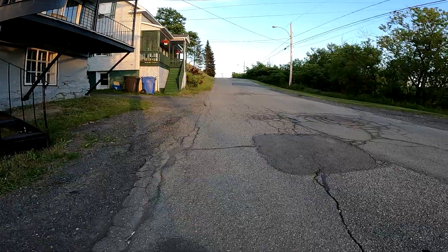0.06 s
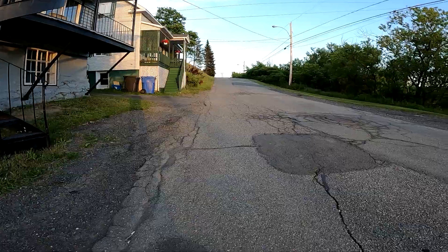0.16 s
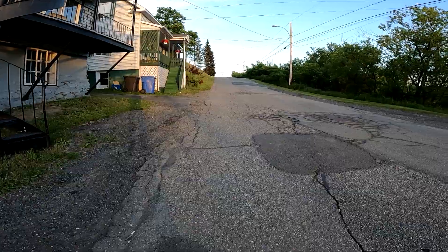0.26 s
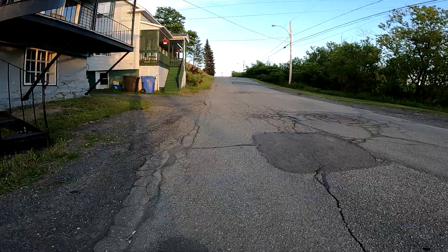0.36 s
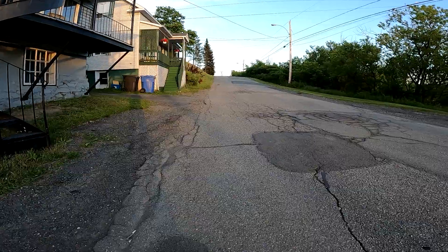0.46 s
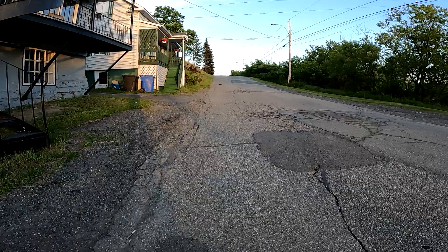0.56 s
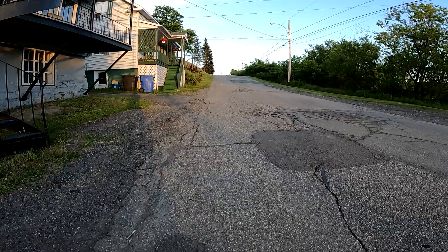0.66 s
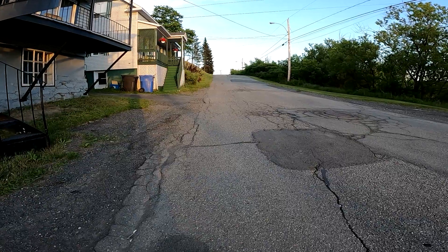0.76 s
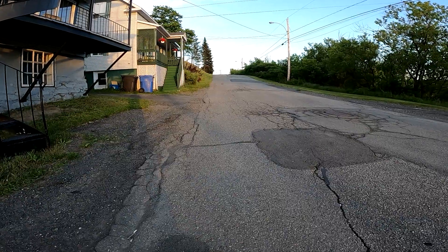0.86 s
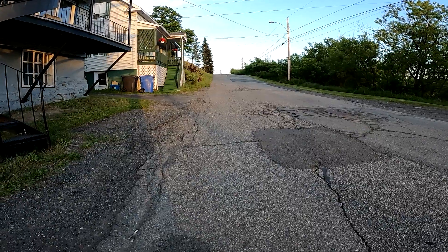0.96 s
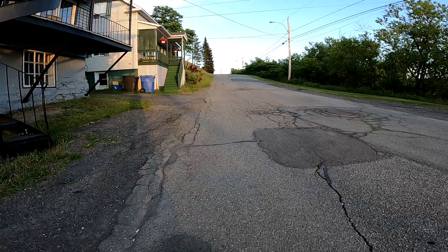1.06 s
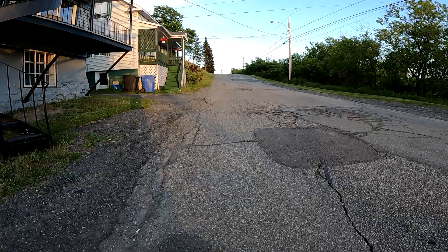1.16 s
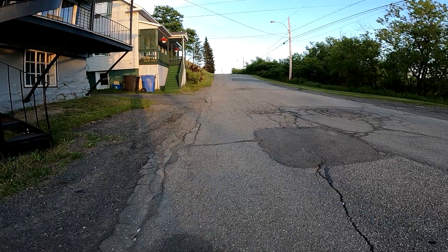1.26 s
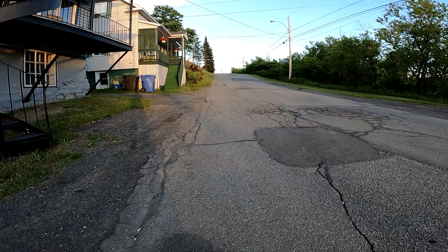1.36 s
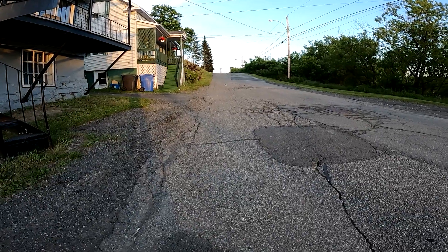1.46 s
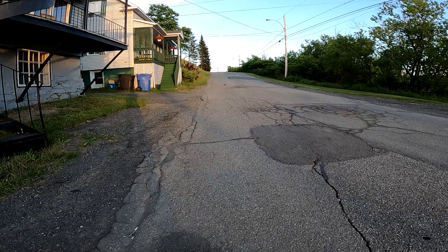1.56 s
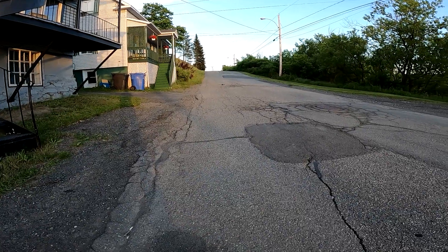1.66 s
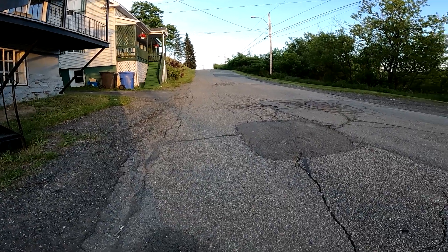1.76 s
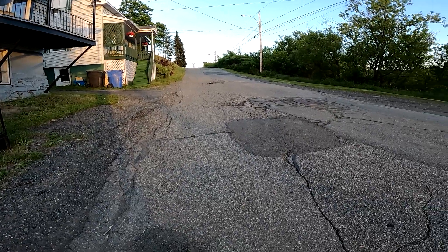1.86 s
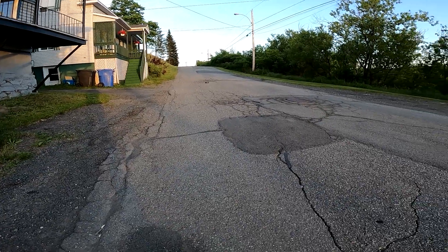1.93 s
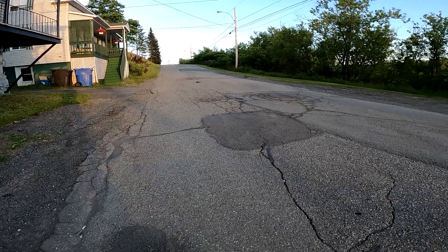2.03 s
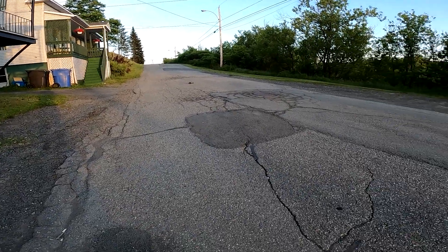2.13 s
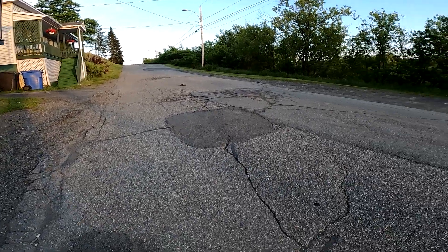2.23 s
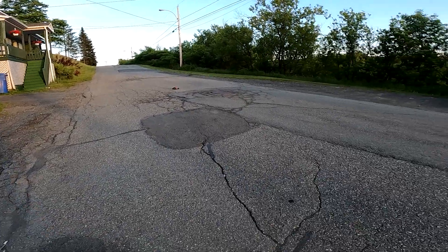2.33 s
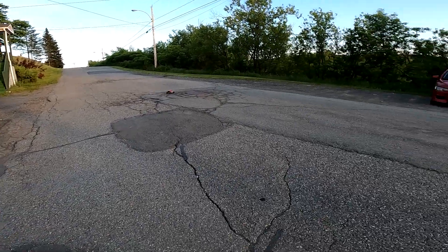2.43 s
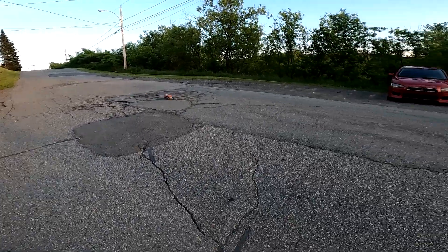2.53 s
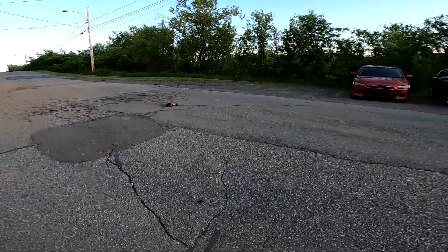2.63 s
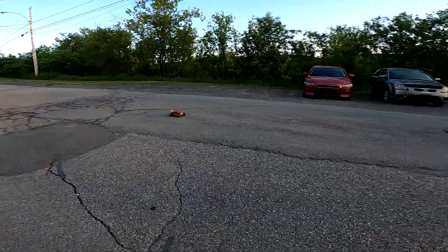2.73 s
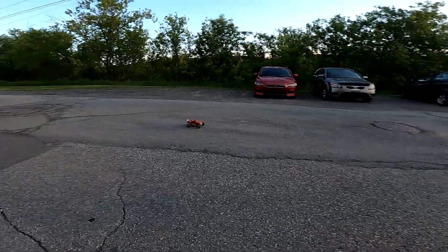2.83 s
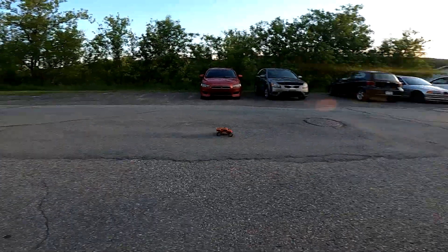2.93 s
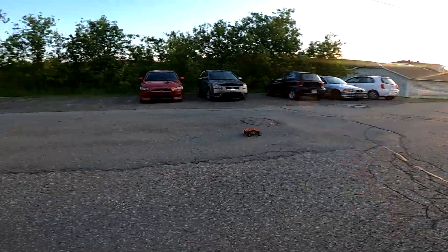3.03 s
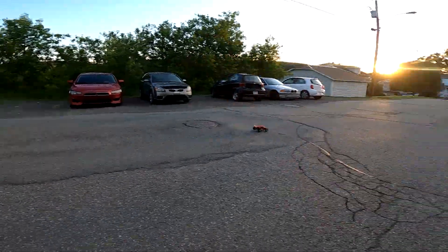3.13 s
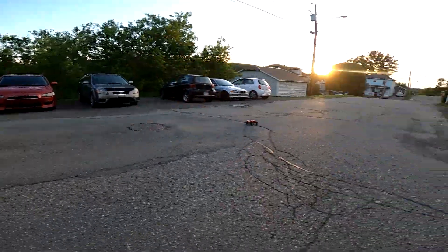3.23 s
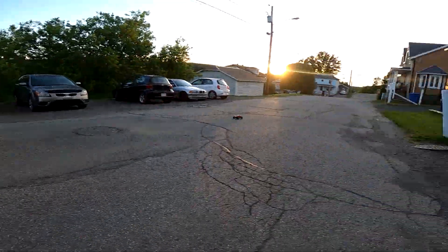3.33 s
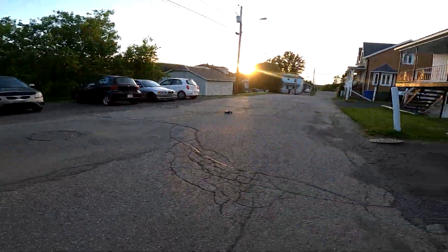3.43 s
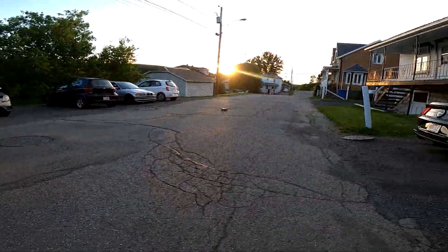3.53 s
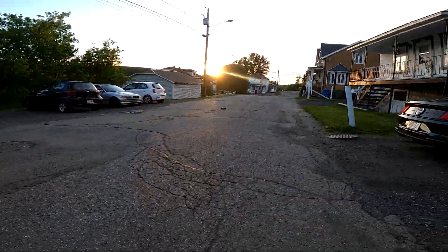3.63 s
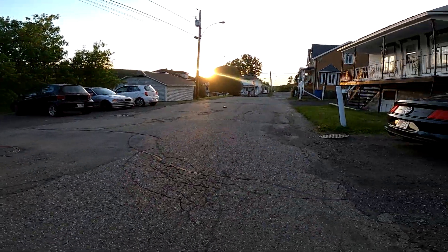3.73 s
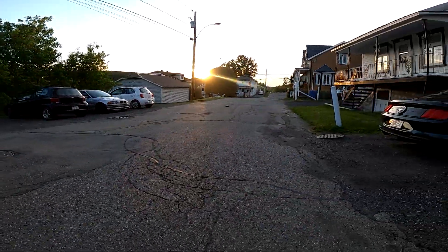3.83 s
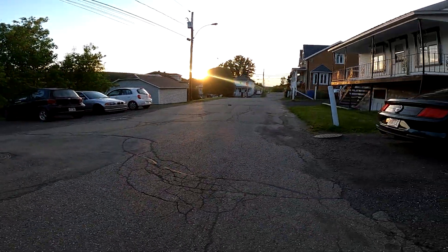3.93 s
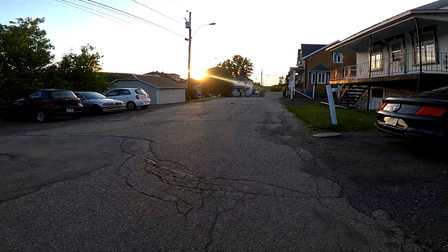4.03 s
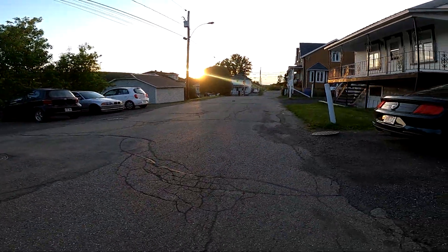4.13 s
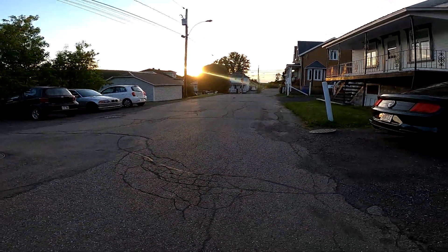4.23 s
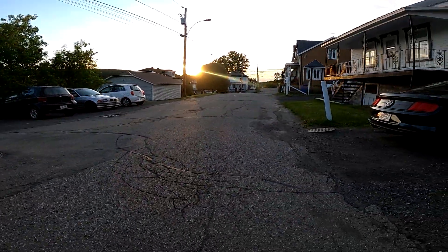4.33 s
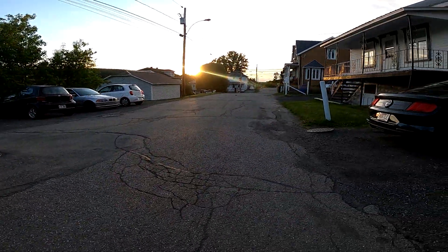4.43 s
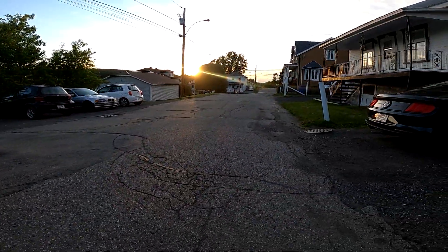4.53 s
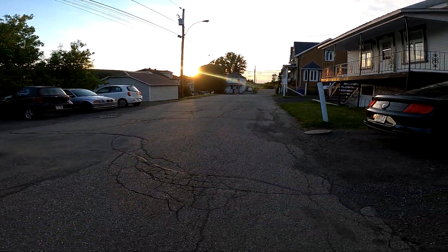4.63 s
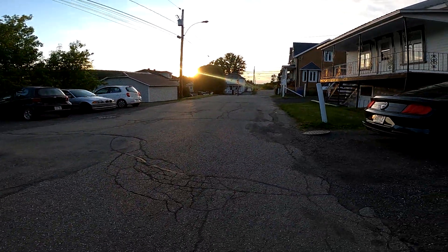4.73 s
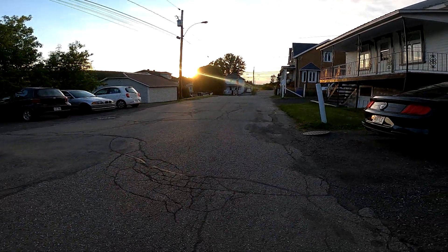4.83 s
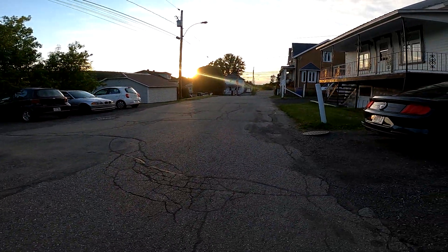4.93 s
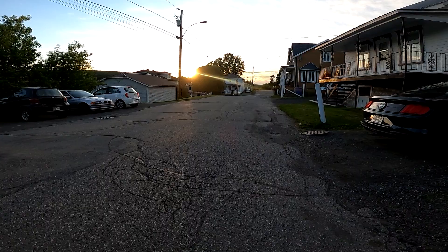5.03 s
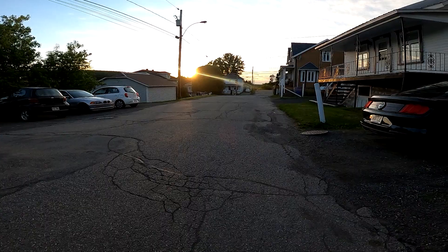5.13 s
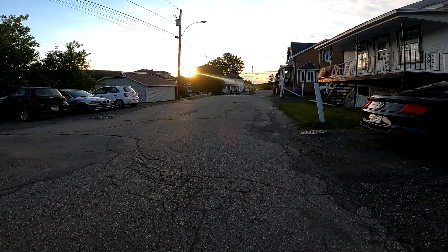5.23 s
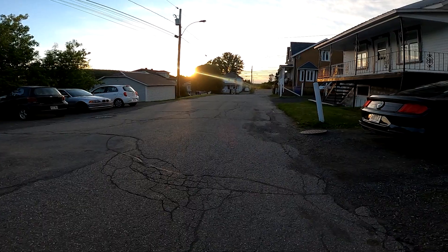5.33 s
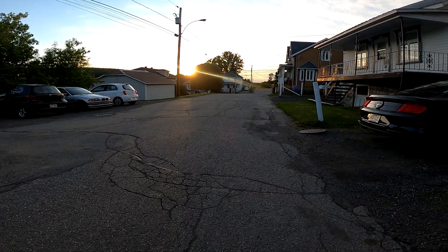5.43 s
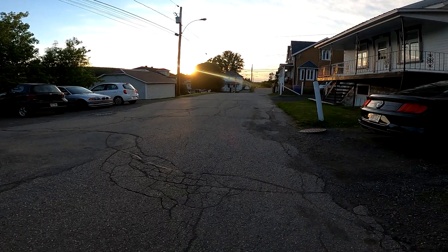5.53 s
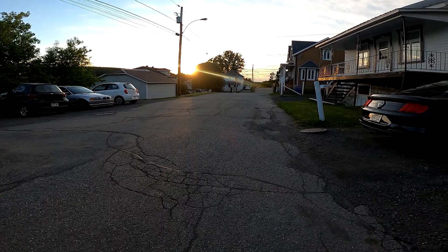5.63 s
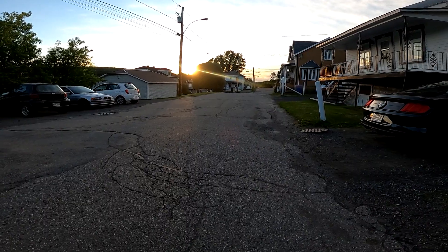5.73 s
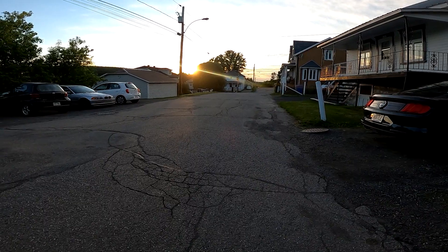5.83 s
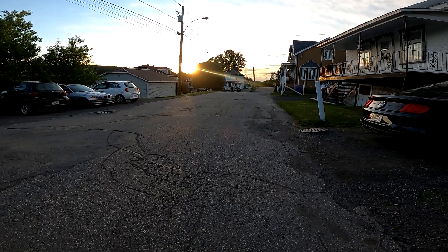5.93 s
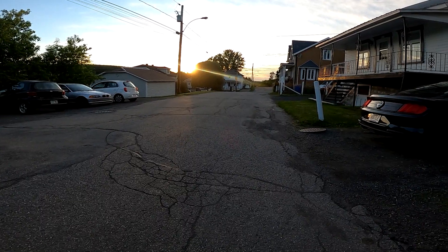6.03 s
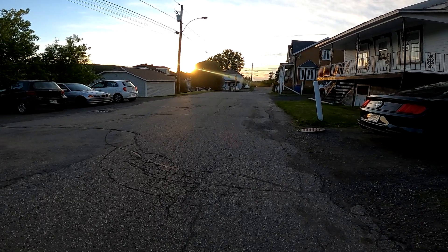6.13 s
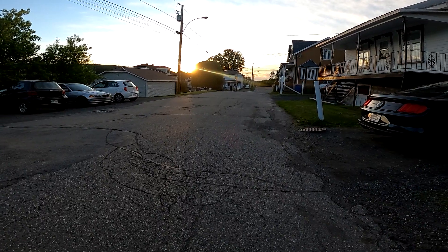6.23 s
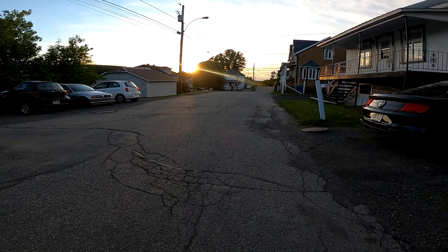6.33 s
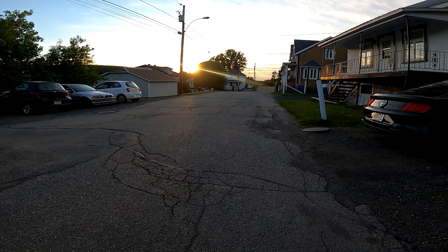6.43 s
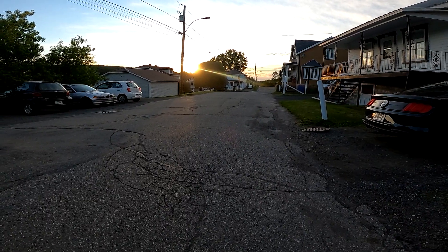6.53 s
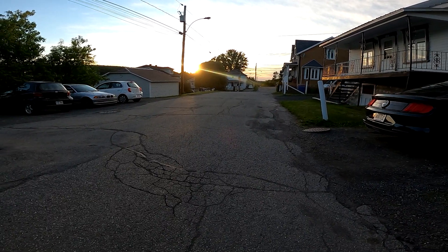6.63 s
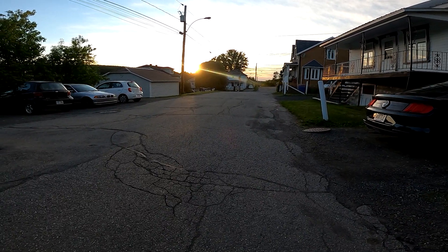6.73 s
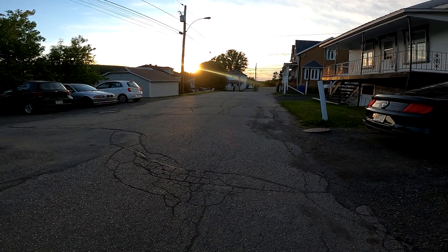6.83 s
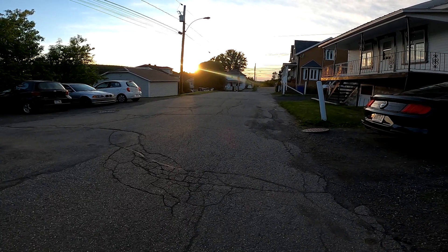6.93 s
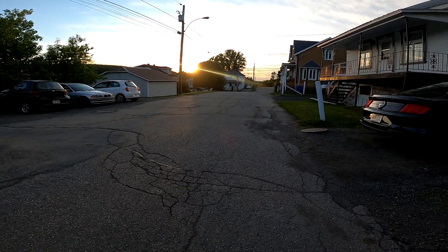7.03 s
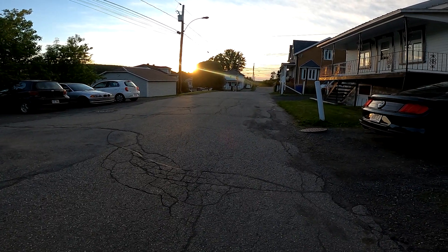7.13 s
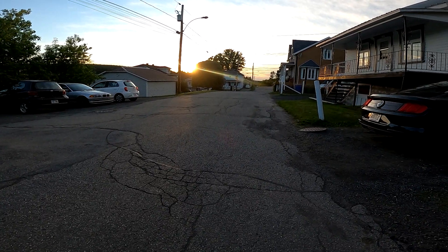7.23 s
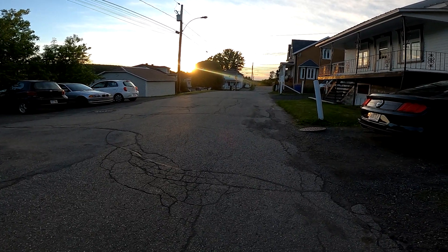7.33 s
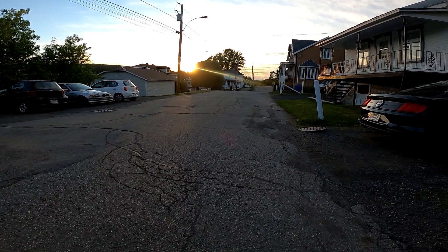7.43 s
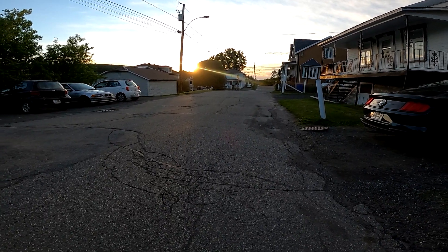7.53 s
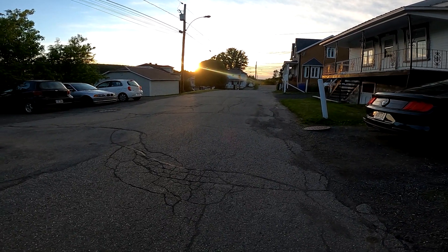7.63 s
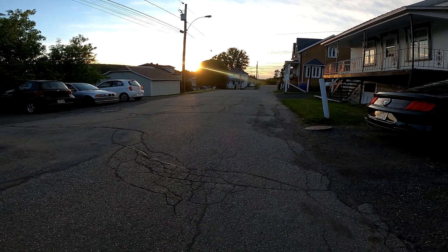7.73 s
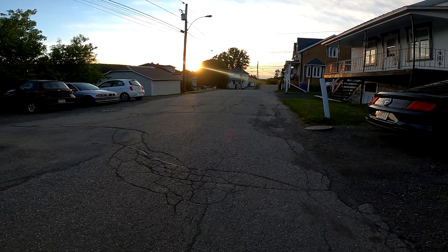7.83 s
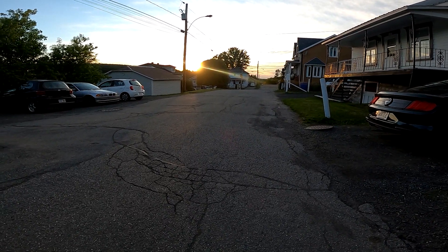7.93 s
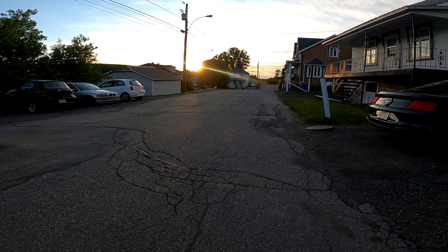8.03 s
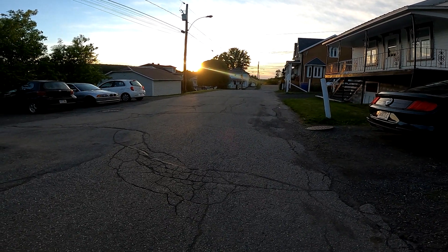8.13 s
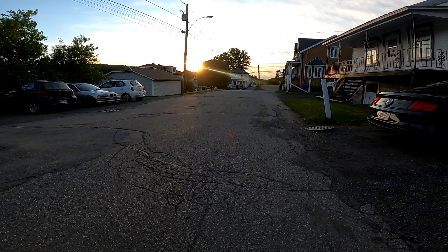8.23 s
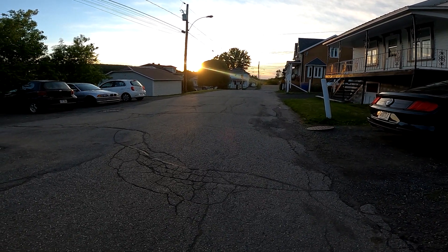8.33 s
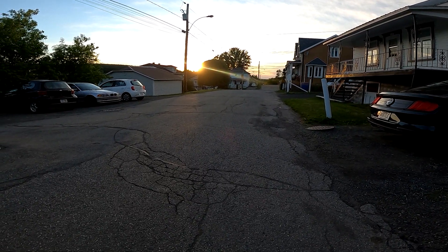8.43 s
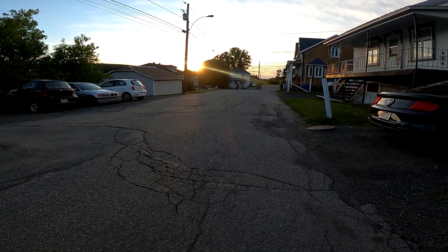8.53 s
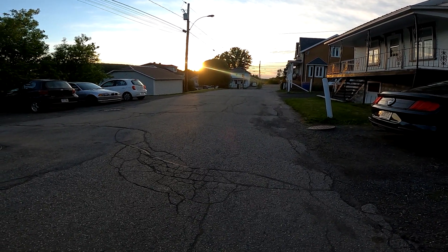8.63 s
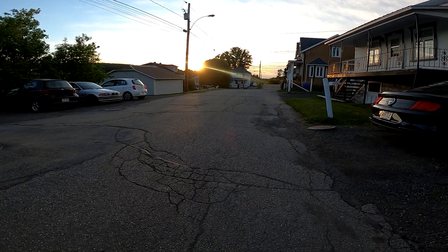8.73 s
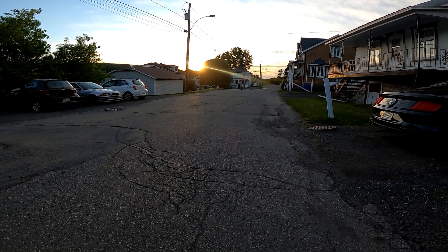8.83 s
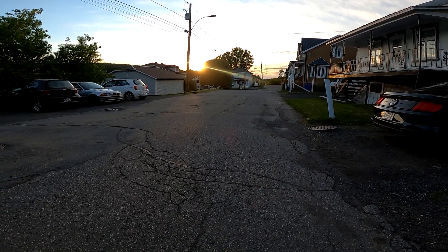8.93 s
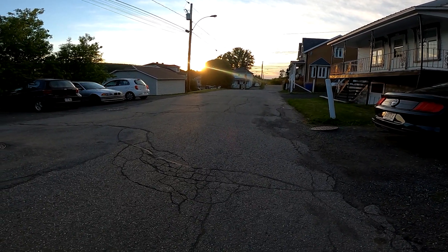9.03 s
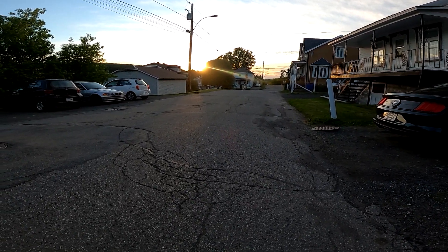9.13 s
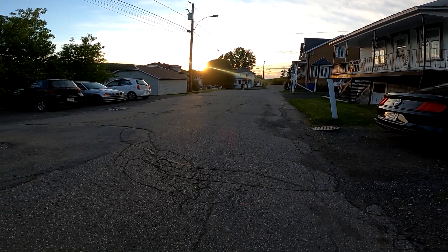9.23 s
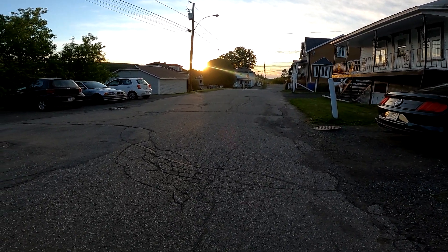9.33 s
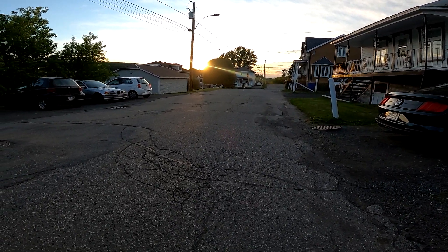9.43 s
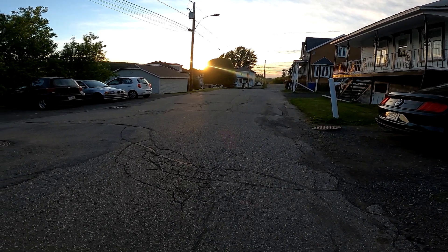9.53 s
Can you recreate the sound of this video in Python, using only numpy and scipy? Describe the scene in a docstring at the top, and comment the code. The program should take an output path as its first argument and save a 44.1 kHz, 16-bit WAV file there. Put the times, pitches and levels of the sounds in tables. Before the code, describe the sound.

A small electric model truck whistles away, swells into a hissing, whining rush past on cracked asphalt, fades down the street, then starts nearer again.

```python
"""From the kerb of a quiet asphalt street: a small electric model truck whistles as it pulls away, then
races past; its gears hiss through a ringing shell, its tyres scuff and its chassis knocks on cracks.
It fades far down the street; a bird chips, the motor whistles up twice more and the truck comes nearer.
All along, a distant engine eases off beside a hum and faint low tones, over far traffic and leaves,
and gusts of wind rumble and buffet the two microphone ports."""
import sys
import numpy as np
from scipy import signal
from scipy.fft import rfft, irfft, next_fast_len
from scipy.io import wavfile
from scipy.ndimage import uniform_filter1d

SR = 44100
rng = np.random.default_rng(int(sys.argv[2]) if len(sys.argv) > 2 else 0)


def output_pcm(signal):
    """Save a mono or channel-first signal as 16-bit PCM at the path in sys.argv[1].

    Samples are clipped to [-1, 1] before scaling.
    """
    pcm = np.clip(np.atleast_2d(signal).T, -1, 1) * 32767
    wavfile.write(sys.argv[1], SR, np.round(pcm).astype(np.int16))


N = 422919

# whine of the meshing gears, wavering as the wheels skip: t/s, f/Hz, level against the truck's/dB
MESH_WHINE = [(.1, 2980, -33), (1.3, 3140, -23), (2.05, 3044, -14), (2.16, 3087, -16.5), (2.27, 3336, -15),
              (2.32, 3130, -20), (2.39, 3370, -9), (2.44, 3203, -10.5), (2.5, 3370, -10), (2.56, 3245, -11),
              (2.6, 3237, -4), (2.66, 3330, -14), (2.72, 3170, -9), (2.79, 3350, -5.5), (2.86, 3130, -14),
              (2.93, 3060, -43), (3.05, 3134, -11.5), (3.2, 3000, -18), (3.45, 2848, -22), (3.51, 2880, -8),
              (3.6, 2825, -15), (3.68, 3096, -10.5), (3.76, 3220, -26), (3.85, 3055, -28),
              (3.95, 3280, -13), (4.03, 3270, -24), (4.1, 3320, -19), (4.3, 3310, -11.5), (4.5, 3200, -27),
              (6.6, 3160, -18), (6.8, 3230, -24.5), (7, 3250, -17), (7.9, 3200, -26), (8.1, 3170, -21.5),
              (8.8, 3230, -20), (9.59, 3276, -23)]


def amp(db):
    """Decibels to gain."""
    return 10 ** (np.asarray(db) / 20)


def evened(x):
    """Scales to rms 1."""
    return x / np.sqrt(np.mean(x ** 2) + 1e-20)


def read(points, hz):
    """A spectrum table on a log-frequency axis."""
    f, value = np.transpose(points)
    return np.interp(np.log(hz + 1), np.log(f + 1), value)


def curves(rows, t):
    """Every column of a time table at times t."""
    s, *columns = np.transpose(rows)
    return [np.interp(t, s, c) for c in columns]


def wander(count, smooth):
    """Slow chance of rms 1, smoothed twice over so many steps."""
    once = uniform_filter1d(rng.standard_normal(count), smooth)
    return evened(uniform_filter1d(once, smooth))


def grid(size, hop):
    """Frequencies (column) and frame times."""
    return np.fft.rfftfreq(size, 1 / SR)[:, None], np.arange(N // hop + 5) * hop / SR


def truck():
    """Gear hiss and tyre roar throbbing once a turn of the shaft, with a mesh whine swaying in phase."""
    shaft_per_s, shaft_depth = 89, 0.12
    t = np.arange(N) / SR
    shaft_turns = np.cumsum(shaft_per_s * (1 + 0.0346 * wander(count=N, smooth=3200))) / SR
    throb = 1 + shaft_depth * np.cos(2 * np.pi * shaft_turns)
    # rough asphalt shakes the shell
    rattle = amp(0.94 * wander(count=N, smooth=100) + 0.4 * wander(count=N, smooth=320))
    frame_s = grid(size=512, hop=128)[1]
    power = amp(2 * np.interp(t, frame_s, truck_db(frame_s))) + scuff_power()
    return (gear_hiss() * throb + mesh(t, shaft_turns)) * rattle * np.sqrt(power)


def truck_db(t):
    """Loudness of the run at the microphone, with its dips and a far burst of throttle."""
    # loudness of the run: t/s, level/dB
    run = [(0, -91), (.11, -61), (.3, -55), (.52, -48.5), (1.14, -40), (1.3, -40), (1.42, -35.5),
           (1.8, -33), (2.17, -26.5), (2.62, -21), (2.89, -25), (3.05, -19.5), (3.13, -19.5), (3.17, -25),
           (3.3, -28), (3.49, -22.5), (4.19, -26.5), (4.51, -35), (4.59, -33), (4.88, -37), (5.04, -37.5),
           (5.14, -41), (5.42, -49.5), (5.82, -53.5), (6.5, -64.5), (7.05, -63.5), (7.3, -68.5),
           (7.75, -74), (7.79, -68), (7.92, -52), (8.33, -51.5), (9.59, -34.5)]
    # the level dips briefly: t/s, depth/dB
    dips = [(1.24, 3), (2.64, 2.5), (2.73, 6.5), (4.18, 1.5), (5.11, 6), (5.181, 8), (5.28, 10.5),
            (5.38, 9), (8.74, 0.5)]
    # short burst of throttle far off: start/s, end/s, level/dB
    bursts = [(6.612, 6.957, -47.5)]
    dip_s, swell_db_per_s, rise_s, fall_db_per_s = 0.028, 7, 0.039, 147  # rise: s for 20 dB
    db = curves(run, t)[0]
    for s, depth in dips:
        db = db - depth * np.exp(-((t - s) / dip_s) ** 2)
    for start, end, top_db in bursts:
        burst_db = top_db - swell_db_per_s * np.maximum(end - t, 0)
        burst_db -= 20 * np.maximum(start - t, 0) / rise_s
        burst_db -= fall_db_per_s * np.maximum(t - end, 0)
        db = np.maximum(db, burst_db)
    return db


def scuff_power():
    """Power added as tyres land and scrub: a fast rise, then a straight fade in decibels."""
    # scuffs: t/s, level/dB (each is played 6 dB lower)
    scuffs = [(2.7521, -24), (3.3156, -16.5), (3.472, -14), (5.0097, -28), (5.1094, -46), (5.2092, -50),
              (5.305, -37), (5.3892, -42), (5.4779, -39), (5.52, -42), (8.7615, -36)]
    fade_s, rise_s = 0.2, 0.007  # fade: s for 60 dB
    power = np.zeros(N)
    age = np.arange(SR // 2) / SR
    for s, db in scuffs:
        burst = amp(2 * (db - 6 - 60 * age / fade_s)) * np.minimum(age / rise_s, 1)
        place = power[round(s * SR):][:len(age)]
        place += burst[:len(place)]
    return power


def gear_hiss():
    """Noise of gears and tyres, coloured by the rings of gearbox, shell, axle, panels and motor can."""
    # colour as the truck turns and tilts: t/s, gearbox ring f/Hz, then levels/dB of gearbox ring,
    # shell ring, motor can ring, tyre roar and top octaves, then closing speed/(m/s)
    colour = [(.1, 2930, -19, 19.5, -5, -10, -9, 5), (.8, 3170, 3, 7, -17, -18, -12.5, 2),
              (1.4, 3170, -3, -0.5, -10, -19.5, -11, 8), (2, 3400, 2.5, 6.5, -8, -4, -4.5, 10),
              (2.25, 3180, 13, 12.5, 3, -1, -0.5, 16), (2.5, 3240, 10.5, 9, 1.5, -6, -0.5, 12),
              (2.68, 3246, 11.5, 10, -3, -2.5, -2.5, 7), (2.85, 3250, -15, 5.5, -30, 0, -5, -1),
              (3, 2970, 7, 12, -8, -3.5, -2.5, 8), (3.12, 2960, 2, 8, -10, 0, -2.5, -7),
              (3.25, 2800, -13, 8, -14, 3.5, 1, -4), (3.47, 2785, -8, 2, -1, -6.5, -1, -5),
              (3.8, 3207, 8, -4, -5, -5.5, -2, -3), (4.3, 3326, 2, 1.5, -4, -5.5, -1, -16),
              (4.6, 3100, -10, -12, -6.5, -2.5, -3.5, -10), (5.05, 3180, -7, -6, -3, -2.5, -2, -16),
              (5.6, 2800, -11, 10, -18, -5, -6, -3), (6.3, 3010, -5, 2, -17, -8, -21, -7),
              (6.6, 2980, -1, 14, -4, -2, -15, -6), (6.8, 2920, -3, 12.5, -4, -7, -10, -1),
              (7.05, 3120, 0, 12.5, -5, 0, -7, -3), (7.9, 3200, 3, 6.5, -15, -9, -14.5, 0.5),
              (8.68, 3008, -18, 0.5, -5.5, -25, -9.5, 1), (9.59, 3133, -15, 0.5, -8, -15, -5, 11)]
    # how far the rings face the microphone: t/s, then levels/dB of axle, panels and lower shell ring
    facing = [(.1, -1, -5, -4), (1, -6, -0.5, -8), (2, -5.5, 2, -14), (2.5, 2.5, 2, -1), (2.9, -3.5, 1, -8),
              (3.5, -4.5, -15, -2), (4.2, -0.5, -4, 0), (4.6, 5, -11, -4), (5.05, 3.5, 7, -13),
              (5.8, -15, -4, -11), (6.6, -9, -7, 11.5), (7, -14, -4, 2), (8, -8, -4, -4), (8.8, -7, 1, -22),
              (9.59, -6, 5.5, -17)]
    # small panels of the shell: f/Hz, width/Hz, relative level/dB
    panels = [(2700, 140, -5.5), (4330, 190, -6), (4780, 110, -10.5), (8460, 450, -26)]
    # hiss of the gears: f/Hz, relative density/dB
    gears = [(180, -48.5), (350, -38), (1100, -23), (1500, -5.5), (2100, -3.5), (2700, -3.5), (4400, -10),
             (5050, -12.5), (5700, -8), (6800, -13), (7600, -18), (8600, -21.5), (9500, -26), (13000, -32),
             (15500, -44)]
    # roar of the tyre treads: f/Hz, relative density/dB
    tyres = [(150, -36), (350, -6), (550, -1.5), (1050, 1), (1500, -1.5), (2500, -12.5), (4000, -46.5)]
    # the wheels leave the ground and the tyre roar drops: start/s, end/s
    hops = [(2.65, 2.77), (3.374, 3.46)]
    hop_db, sound_m_per_s = -9, 343
    core_width, skirt_width, skirt_db = 220, 900, -1  # Hz, Hz, dB
    skirt_thins = 0.091  # dB of skirt lost for each dB that the core stands out
    can_hz, can_upper_hz, can_width, can_upper_db = 5720, 6120, 270, -0.5
    axle_hz, axle_width, shell_hz, shell_width = 3860, 520, 1570, 220
    under_hz, under_width = 1240, 580  # broader ring under the shell's

    size = 512
    hz, t = grid(size=size, hop=128)
    gearbox_hz, core_db, shell_db, can_db, tyre_db, sheen_db, closing = curves(colour, t)
    axle_db, panels_db, under_db = curves(facing, t)
    airborne = sum(1. * (t > start) * (t < end) for start, end in hops)
    tyre_db = tyre_db + hop_db * uniform_filter1d(airborne, size=5)
    closing = closing + 3 * wander(count=len(t), smooth=30)  # the truck weaves
    doppler = 1 + closing / sound_m_per_s

    def ring(centre_hz, width, db):
        """Power of one resonance."""
        return amp(2 * db) / (1 + (2 * (hz - centre_hz) / width) ** 2) ** 2

    # air and angle change the top octaves most
    octaves_up = np.clip(np.log2(hz / 4000 + 1e-9), 0, 2)
    power = amp(2 * (read(gears, hz) + 1.5 + sheen_db * octaves_up))
    power = power + ring(curves(MESH_WHINE, t)[0], core_width, core_db)
    power += ring(gearbox_hz, skirt_width, skirt_db - skirt_thins * np.maximum(core_db, 0))
    power += ring(can_hz * doppler, can_width, can_db)
    power += ring(can_upper_hz * doppler, can_width, can_db + can_upper_db)
    power += ring(axle_hz * doppler, axle_width, axle_db)
    for f, width, db in panels:
        power += ring(f * doppler, width, db + panels_db)
    # the truck's loudness counts 2 to 8 kHz, ahead of the shell's low rings and the tyres
    middle = power[(hz[:, 0] > 2000) & (hz[:, 0] < 8000)].sum(0)
    shell_now_hz = shell_hz * (1 + 0.018 * wander(count=len(t), smooth=29))
    power += ring(shell_now_hz, shell_width, shell_db + 1.64 * wander(count=len(t), smooth=20))
    power += ring(under_hz, under_width, under_db)
    power += amp(2 * (read(tyres, hz) + tyre_db))
    # the divisor allows for the overlap of the frames
    return port_noise(np.sqrt(power / middle), hz, size=size, patchy_db=1.2) / np.sqrt(8 / 3)


def mesh(t, shaft_turns):
    """A wavering tone of meeting teeth, its phase swaying once a turn of the shaft."""
    # fast pitch jitter, tighter from the front: t/s, rms share of the pitch
    blur = [(1.9, .02), (2.2, .012), (2.9, .012), (3.4, .032), (6, .032), (6.6, .015), (9.59, .015)]
    side_depth = 0.9  # rad, makes the once-a-turn sidebands
    hz, db = curves(MESH_WHINE, t)
    jitter = curves(blur, t)[0] * wander(count=N, smooth=120)
    turns = np.cumsum(hz * (1 + jitter)) / SR
    tone = np.sin(2 * np.pi * turns + side_depth * np.sin(2 * np.pi * shaft_turns))
    return at_ports(np.sqrt(2) * amp(db + 3 * wander(count=N, smooth=250)) * tone, 0)


def knocks():
    """Short dull blows of the plastic chassis on cracks: a broad puff with a weak ring."""
    # knocks: t/s, level/dB, ring f/Hz
    blows = [(2.59, -25, 720), (2.78, -22, 500), (2.872, -18, 567), (2.941, -18, 770), (3.266, -8.5, 900)]
    fade_s, rise_s = 0.039, 0.0027  # fade: s for 60 dB
    out, t = np.zeros(N), np.arange(1500) / SR
    puff_band = signal.butter(3, [160, 1350], "band", fs=SR)
    for s, db, hz in blows:
        puff = evened(signal.lfilter(*puff_band, rng.standard_normal(len(t))))
        blow = 0.34 * np.sin(2 * np.pi * hz * t) + 0.5 * puff
        out[round(s * SR):][:len(t)] += amp(db - 60 * t / fade_s) * blow * np.minimum(t / rise_s, 1)
    return at_ports(out, 0)


def motor():
    """The whistle of every pull-away, smeared by the house fronts."""
    # pull-aways: start t/s, climb begins t/s, time to climb an octave/s, bend of the climb, loudest t/s,
    # swell/(dB/s), end t/s, peak level/dB, fade/(dB/octave), held level/dB, overtone level/dB, top f/Hz
    pull_aways = [(0.113, 0.149, 0.35, 1.37, 0.2, 110, 1.6, -57, 21, -66, -78, 6010),
                  (6.57, 6.622, 0.172, 1.1, 6.618, 260, 6.705, -47, 29, -70, -78, 6010),
                  (7.75, 7.78, .31, 2.4, 7.89, 85, 8.3, -52.5, 33, -75, -81, 6170)]
    out = np.zeros(N)
    for row in pull_aways:
        tone = whistle(*row)
        out[round(row[0] * SR):][:len(tone)] += tone
    return at_ports(smeared(out, t60_s=0.22, echo_db=-5), 0.54)


def whistle(start, climb, octave_s, bend, loudest, swell_db, end, peak_db, fade_db, held_db,
            overtone_db, hold_hz):
    """A tone that waits, climbs as the motor speeds up and holds; its octave sounds low in the climb."""
    # the shell passes the whistle unevenly: f/Hz, gain/dB
    path = [(2900, 0), (3250, 2), (3500, -5), (3780, 4), (4100, -3), (4500, -1), (5000, -8), (5700, 0),
            (6300, 0), (6900, 1), (7300, -4), (8500, 0), (9000, -10)]
    rest_hz, overtone_top_hz, held_fade_db_per_s = 2950, 4400, 5
    t = np.arange(round((end - start) * SR)) / SR + start
    octaves = (np.maximum(t - climb, 0) / octave_s) ** bend
    top_hz = hold_hz * (1 + 0.003 * wander(count=len(t), smooth=2800))
    hz = np.minimum(rest_hz * 2 ** np.minimum(octaves, 2), top_hz)

    climb_db = peak_db - swell_db * np.maximum(loudest - t, 0) + read(path, hz)
    climb_db -= fade_db * np.maximum(octaves - np.interp(loudest, t, octaves), 0)
    steady_db = held_db - held_fade_db_per_s * (t - climb - octave_s)
    steady_db += 2 * wander(count=len(t), smooth=3100)
    near_top = uniform_filter1d(1. * (hz >= .92 * top_hz), size=1500)
    gain = amp(climb_db) + amp(steady_db) * near_top

    low_in_climb = uniform_filter1d(1. * (hz < overtone_top_hz), size=1500)
    octave_db = overtone_db - 6 * octaves.clip(0, 1) + read(path, 2 * hz)
    octave_db += 4 * wander(count=len(t), smooth=350)
    octave_gain = amp(octave_db) * low_in_climb

    turns = np.cumsum(hz * (1 + 0.0074 * wander(count=len(t), smooth=20))) / SR
    on = np.minimum(np.minimum(t - start, end - t) / 0.02, 1)
    flutter = amp(3.2 * wander(count=len(t), smooth=250))
    tone = gain * np.sin(2 * np.pi * turns) + octave_gain * np.sin(4 * np.pi * turns)
    return np.sqrt(2) * tone * on * flutter


def buffets():
    """Single buffets of wind: each a cycle or two of pressure, stronger on one port."""
    # buffets: t/s, level/dB, left minus right/dB
    pushes = [(0.12, -21.5, 15), (2.929, -18.5, 19), (2.994, -21, 10), (3.074, -19, 16), (3.114, -31, 17),
              (3.212, -22, 14), (7.91, -24.5, -7), (8.089, -17, 20), (8.208, -25, -11), (9.179, -22, -.5)]
    buffet_hz = 50.5
    out = np.zeros((2, N))
    t = np.arange(0, 1.94 / buffet_hz, 1 / SR)
    push = 0.57 * np.sin(2 * np.pi * buffet_hz * t) * np.hanning(len(t))
    for s, db, pan_db in pushes:
        out[:, round(s * SR):][:, :len(t)] += amp([[db + pan_db / 2], [db - pan_db / 2]]) * push
    return out


def wind():
    """Lumpy rumble, its noise unrelated at the two ports; stronger gusts reach higher."""
    # gusts: t/s, half hold/s, level/dB, left minus right/dB
    gusts = [(0.122, 0.01, -36.5, 2), (0.699, 0.13, -65, 0), (1.276, 0.04, -62, -5), (1.81, .02, -64, -9),
             (2.201, .1, -62, -2), (2.54, 0.11, -44.5, -4), (2.934, 0.034, -35.5, 2),
             (3.097, 0.019, -30.5, 10.5), (3.22, 0.016, -35, 11), (3.58, 0.022, -46, 4),
             (4.7, 0.14, -61, -7), (5.376, 0.018, -57, -1), (7.211, 0.016, -47, 3), (7.371, .02, -54, -11),
             (7.87, 0.052, -44.5, -8), (8.118, 0.032, -40, 1.5), (8.299, 0.12, -43, 3),
             (8.854, 0.0091, -44.5, -3), (9.2, .01, -40.5, -5.5), (9.549, 0.055, -51, -12)]
    # spectrum of a gust: f/Hz, relative density/dB
    rumble = [(10, -7), (35, 7.5), (70, 2), (140, -10.5), (280, -48), (600, -78)]
    lull_db, lull_pan_db, fall_db_per_s = -68, 4, 115.5
    hz, t = grid(size=1024, hop=256)
    out = []
    for side in (1, -1):
        port_db = np.full(len(t), lull_db + side * lull_pan_db / 2)
        for s, hold, db, pan_db in gusts:
            fall_db = fall_db_per_s * np.maximum(abs(t - s) - hold, 0)
            port_db = np.maximum(port_db, db + side * pan_db / 2 - fall_db)
        reach = 2 ** ((port_db + 46) / 22)  # stretches the spectrum upward
        lumps_db = 3.1 * wander(count=len(t), smooth=2)
        gain = amp(read(rumble, hz / reach) + port_db + lumps_db) / np.sqrt(reach)
        a, b = rng.standard_normal(gain.shape[::-1] + (2,)).T
        out.append(signal.istft((a + 1j * b) * gain, nperseg=1024, noverlap=768)[1][:N])
    return np.array(out)


def bird():
    """Tiny falling chips and lower notes, each trailing an echo."""
    # chips: t/s, level/dB, f/Hz
    chips = [(5.975, -72, 4560), (6.03, -66, 4600), (6.165, -68, 4650), (6.285, -70, 4430),
             (6.57, -69, 4400), (6.0556, -67, 4560), (6.119, -63, 4420), (6.2073, -65, 4500),
             (6.3061, -65, 4570), (6.3989, -67, 4340), (6.5056, -67, 4600), (6.6016, -66, 4366),
             (6.7974, -64, 4430), (7.0047, -60, 4460), (7.1009, -64, 4450), (7.211, -65, 4400),
             (7.055, -69, 4450), (7.255, -79, 4360)]
    # lower single notes: t/s, level/dB, f/Hz
    notes = [(5.945, -54, 2500), (7.395, -55, 2150)]
    out = np.zeros(N)
    for rows, length_s, fall in ((chips, .042, 1.4), (notes, .04, .3)):
        t = np.arange(0, length_s, 1 / SR)
        swell = np.hanning(len(t))
        for s, db, hz in rows:
            turns = hz * t * (1 + fall * (length_s / 2 - t))
            call = swell ** 2 * np.sin(2 * np.pi * turns)
            if hz > 3000:  # chips carry a longer lower octave
                call = call + amp(0.5) * np.sin(np.pi * turns)
            out[round((s - length_s / 2) * SR):][:len(t)] += amp(db) * swell * call
    return at_ports(smeared(out, t60_s=.5, echo_db=-2), 0.6)


def engine():
    """A distant engine easing off: three orders of its firing rate, each wavering in level and phase."""
    # engine: t/s, firing f/Hz, then levels/dB of its first three orders
    firing = [(0, 68.47, -50.5, -54, -59), (1.2, 67.8, -49.5, -56, -52.5), (2.2, 70, -48.5, -62.5, -46),
              (3, 69.57, -68.5, -67.5, -53), (3.7, 68.5, -41, -44, -56), (4.4, 67.9, -48, -52, -47.5),
              (5.25, 66.4, -39.5, -44.5, -46), (6.3, 62.8, -59.5, -47, -51.5), (6.8, 59.8, -46, -40.5, -66),
              (7.25, 59.76, -42, -50, -46), (7.9, 57.9, -47.5, -51, -47), (9.59, 57, -48.5, -53.5, -46.5)]
    hz, *orders_db = curves(firing, np.arange(N) / SR)
    turns, out = np.cumsum(hz) / SR, np.zeros(N)
    for order, db in enumerate(orders_db, 1):
        drift = 0.13 * wander(count=N, smooth=2560)
        waver_db = 2.25 * wander(count=N, smooth=2000)
        out += amp(db + waver_db) * np.sin(2 * np.pi * (order * turns + drift))
    return at_ports(np.sqrt(2) * out, 0.63)


def hum_and_low_tones():
    """A steady hum and faint low tones that swell and fade, some gliding in pitch; all are sines."""
    # hum: t/s, f/Hz, level/dB
    hum = [(0, 140.8, -43), (7.4, 142.5, -50), (9.59, 140.4, -48)]
    # faint low tones: start/s, end/s, from f/Hz, to f/Hz, peak level/dB
    low_tones = [(3.805, 4.72, 96, 110, -43.5), (2.5, 7.2, 240, 213, -51), (6.9, 7.8, 200, 160, -52.5),
                 (9.5, 19, 120, 123, -40.5), (6.3, 7.8, 61, 80, -48), (4.5, 8.3, 240, 240, -57)]
    t = np.arange(N) / SR
    hum_hz, hum_db = curves(hum, t)
    lines = [(hum_hz, amp(hum_db))]
    for start, end, from_hz, to_hz, db in low_tones:
        done = np.clip((t - start) / (end - start), 0, 1)
        lines.append((from_hz + (to_hz - from_hz) * done, amp(db) * np.sin(np.pi * done)))
    out = np.zeros(N)
    for hz, gain in lines:
        waver = amp(1.5 * wander(count=N, smooth=5100))
        out += gain * waver * np.sin(2 * np.pi * np.cumsum(hz) / SR)
    return at_ports(np.sqrt(2) * out, 0.63)


def street():
    """Far traffic and leaves: shaped noise, swelling slowly."""
    # spectrum of the street: f/Hz, relative density/dB
    backdrop = [(15, -48.5), (25, -11.5), (49, -2.5), (68, -1), (96, -4), (124, -7), (178, -2.5),
                (323, -19.5), (839, -30), (1030, -21), (1600, -28), (2300, -38), (2820, -44), (4500, -52),
                (6000, -51.5), (12000, -79.5), (15600, -118), (22000, -120)]
    # the street above the rumble: t/s, gain/dB
    mids = [(0, 2), (1, 2), (6.5, 1.5), (7.5, -1), (9.59, 1)]
    street_db = -41.5
    hz, t = grid(size=2048, hop=512)
    swell_db = 0.9 * wander(count=len(t), smooth=24)
    gain = amp(read(backdrop, hz) + curves(mids, t)[0] * (hz > 260) + swell_db)
    return amp(street_db) * evened(port_noise(gain, hz, size=2048, patchy_db=1.17))


def smeared(x, t60_s, echo_db):
    """A far sound with its scattered echo from the house fronts: fading noise after a short gap."""
    t = np.arange(SR // 3) / SR
    echo = rng.standard_normal(len(t)) * amp(-60 * t / t60_s) * (t > .004)
    return x + amp(echo_db) * signal.oaconvolve(x, echo / np.linalg.norm(echo))[:N]


def port_noise(gain, hz, size, patchy_db):
    """Random spectra under a gain field, in drifting patches, heard by two close ports."""
    # likeness of left and right: f/Hz, share
    likeness = [(40, 0.88), (150, 1), (400, 0.9), (1200, 0.91), (3000, 0.99), (5600, 0.82), (9000, .47),
                (15000, .45)]
    a, b, c, d, patches = rng.standard_normal(gain.shape[::-1] + (5,)).T
    patches = uniform_filter1d(patches, size=6, axis=0)
    patches = evened(uniform_filter1d(patches, size=16, axis=1))
    alike = np.clip(read(likeness, hz), 0, 1)
    left = a + 1j * b
    right = alike * left + np.sqrt(1 - alike ** 2) * (c + 1j * d)
    spectra = np.array([left, right * right_port(hz)]) * gain * amp(patchy_db * patches)
    return signal.istft(spectra, nperseg=size, noverlap=size - size // 4)[1][:, :N]


def right_port(hz):
    """Gain and phase lag of the right port against the left."""
    # right over left: f/Hz, gain/dB
    right_gain = [(100, .5), (350, 0), (700, -.2), (1400, -.7), (2800, 1), (5600, .1), (10000, 1.2),
                  (14000, 2)]
    # right behind left: f/Hz, phase lag/rad
    right_lag = [(50, 0.2), (350, 0.075), (700, 0.47), (1300, 0.58), (2800, 0.72), (4300, 0.91),
                 (5600, 0.93), (10000, 1.83), (15000, 2.4)]
    return amp(read(right_gain, hz)) * np.exp(-1j * read(right_lag, hz))


def at_ports(x, right_db):
    """One source at both ports, the right one given its own gain and phase lag."""
    size = next_fast_len(N)
    response = right_port(np.fft.rfftfreq(size, 1 / SR))
    return np.array([x, amp(right_db) * irfft(rfft(x, size) * response, size)[:N]])


def scene():
    """All sources at the two ports."""
    near = truck() + knocks() + motor() + buffets() + wind()
    return near + bird() + engine() + hum_and_low_tones() + street()


def record(dry):
    """The band limit: a steep low-pass."""
    edge_hz = 15600
    low_pass = signal.firwin(511, edge_hz, window=("kaiser", 9), fs=SR)
    return signal.oaconvolve(dry, low_pass[None], "same")


dry = scene()
out = record(dry)
output_pcm(out)
```